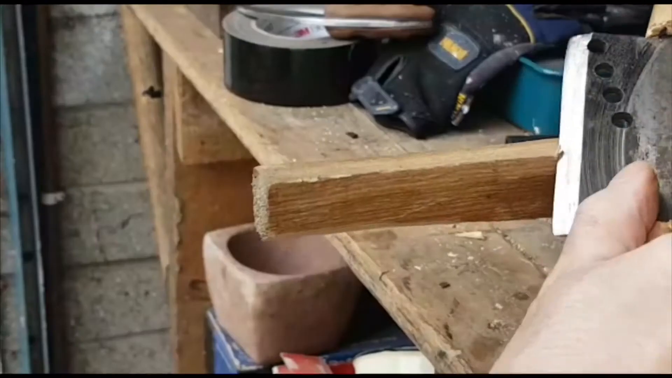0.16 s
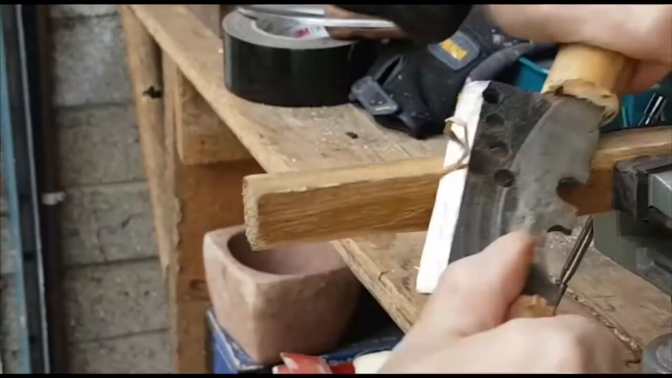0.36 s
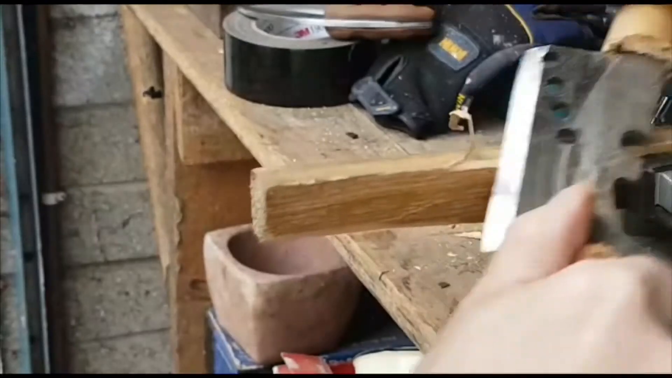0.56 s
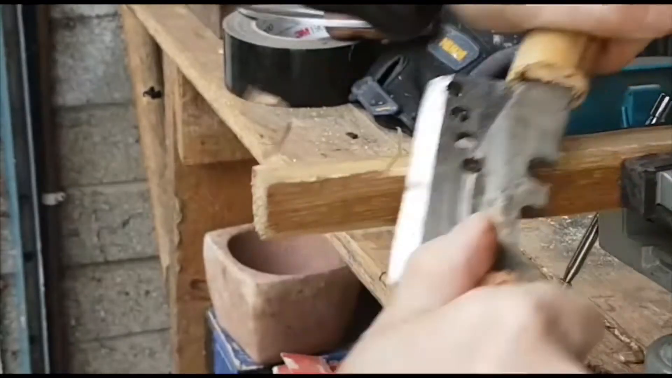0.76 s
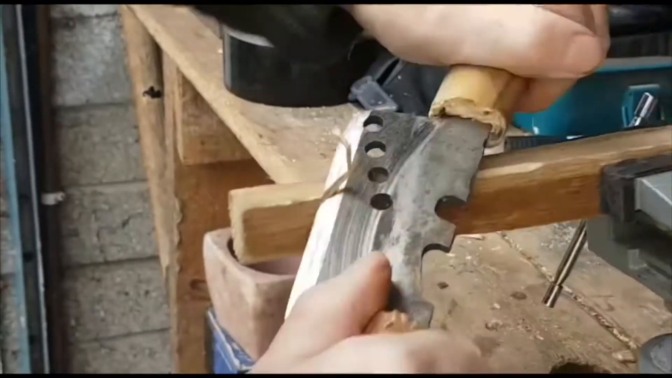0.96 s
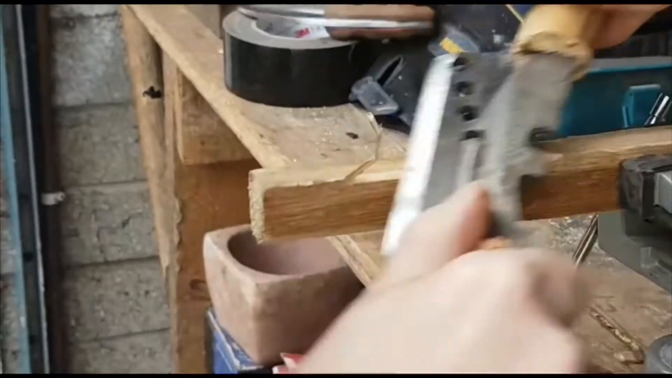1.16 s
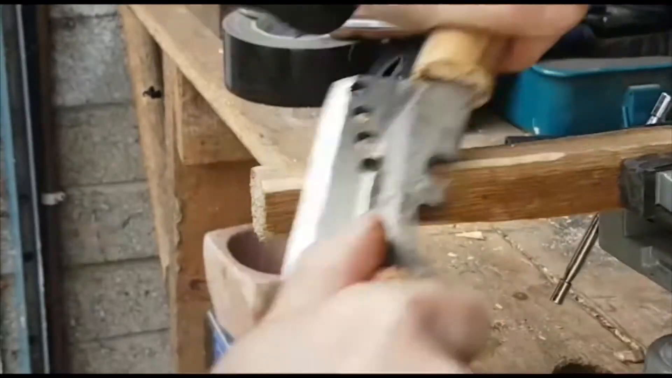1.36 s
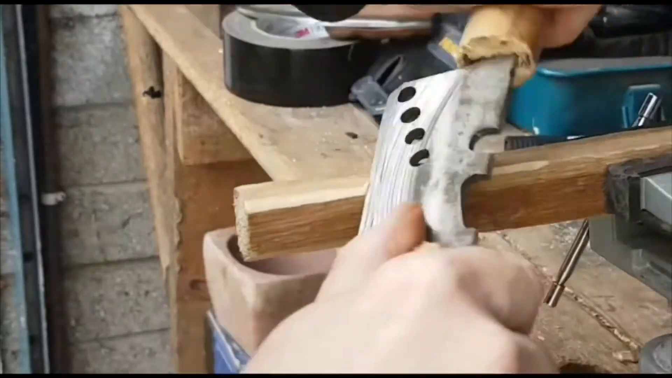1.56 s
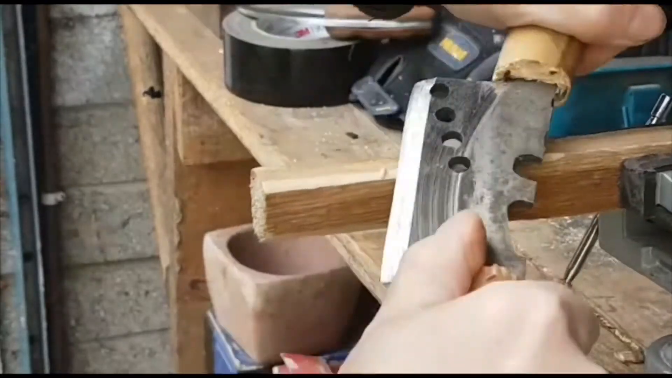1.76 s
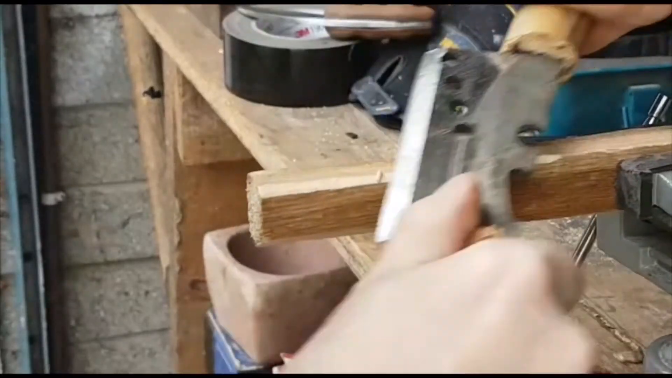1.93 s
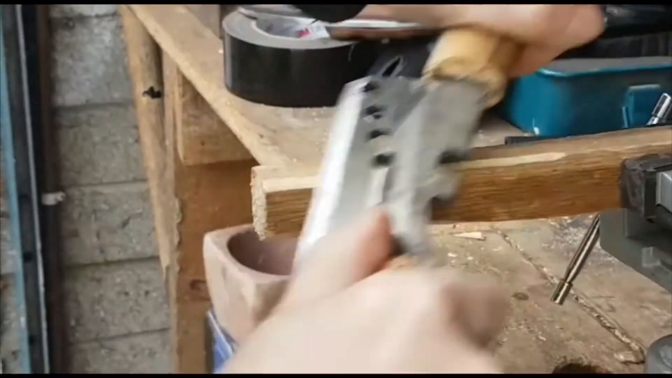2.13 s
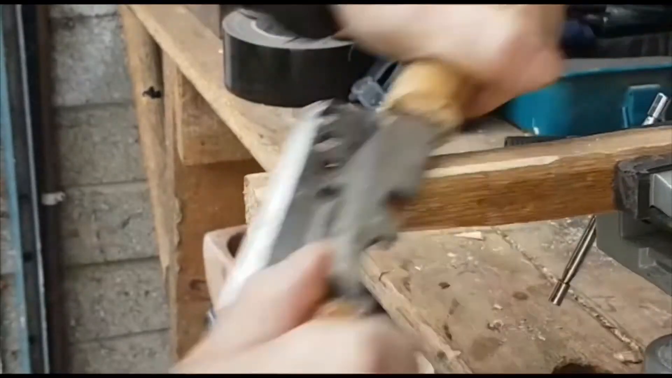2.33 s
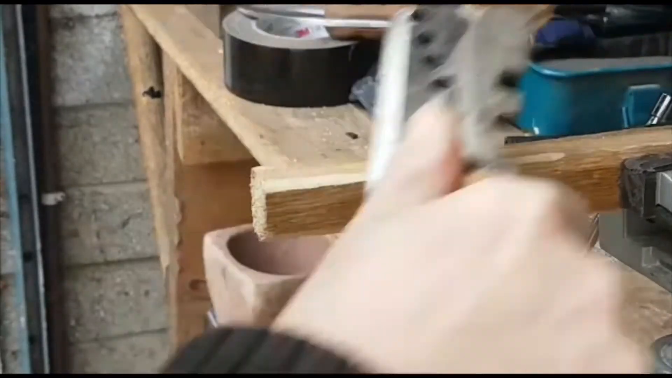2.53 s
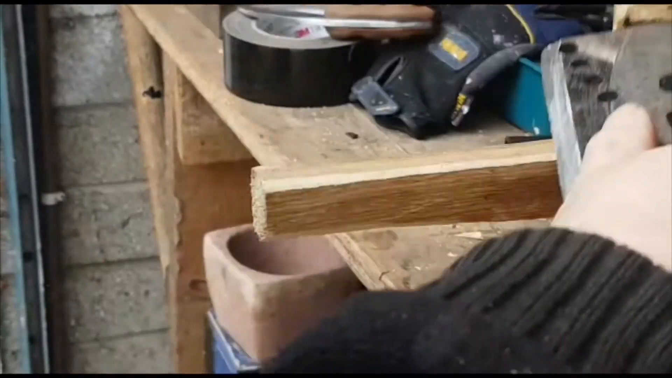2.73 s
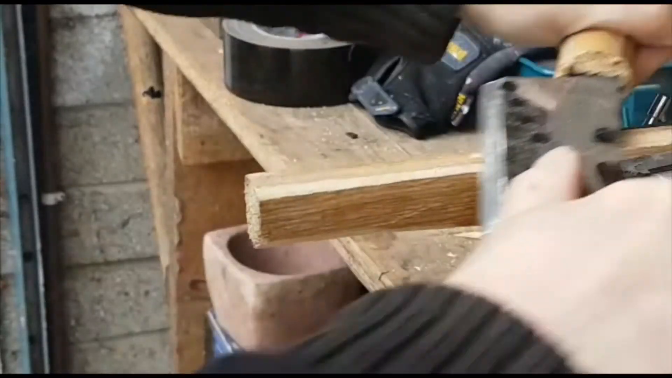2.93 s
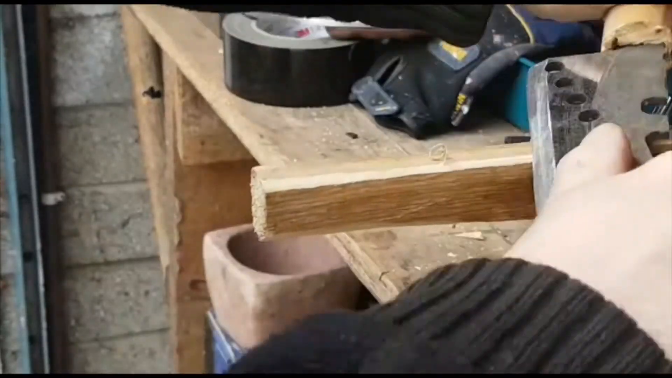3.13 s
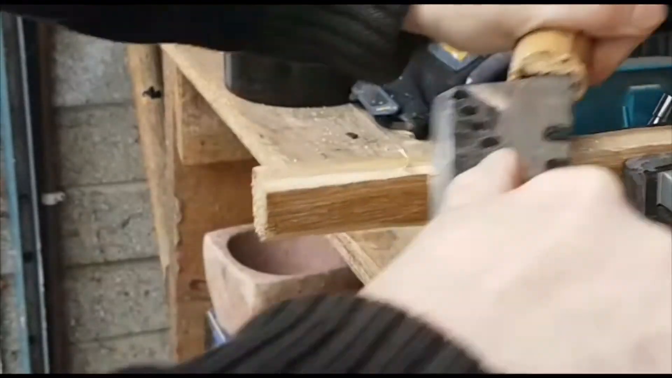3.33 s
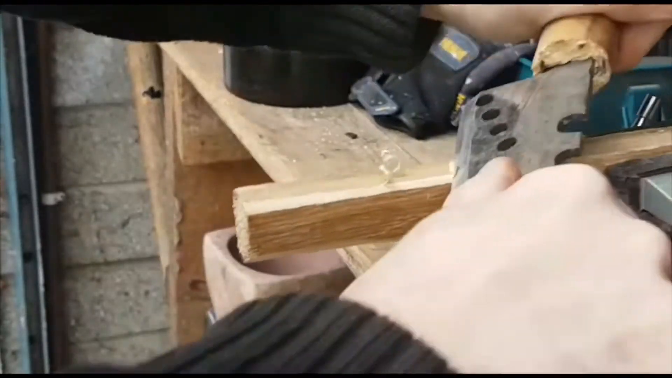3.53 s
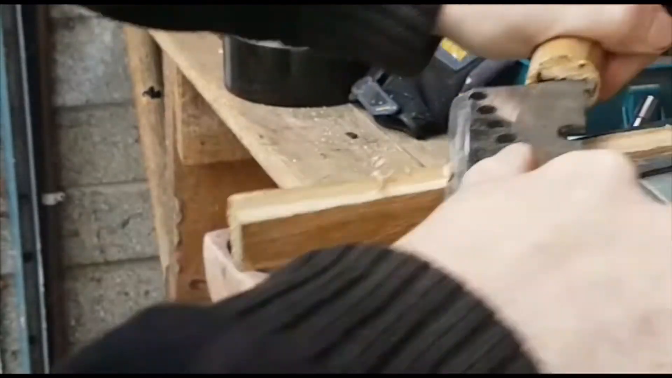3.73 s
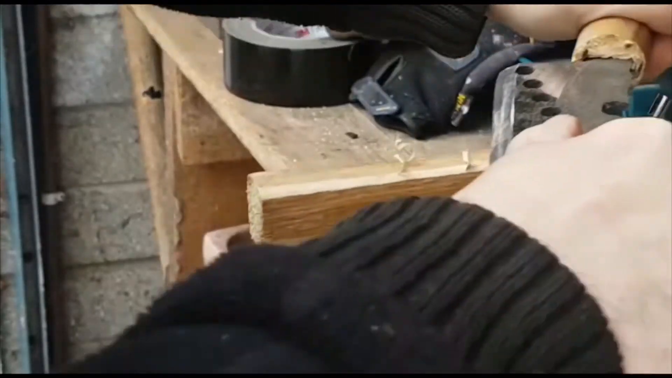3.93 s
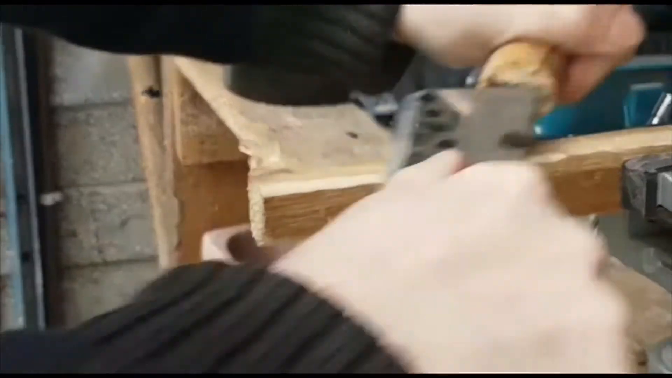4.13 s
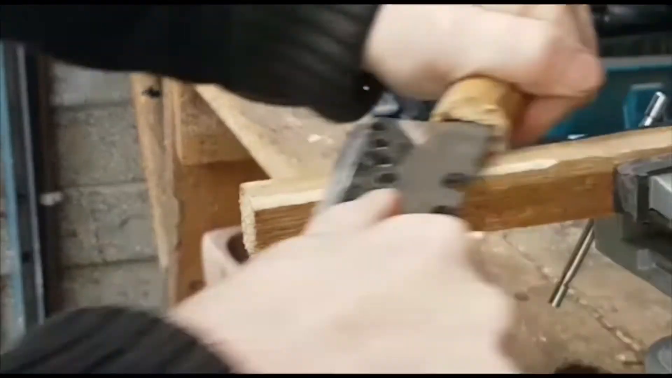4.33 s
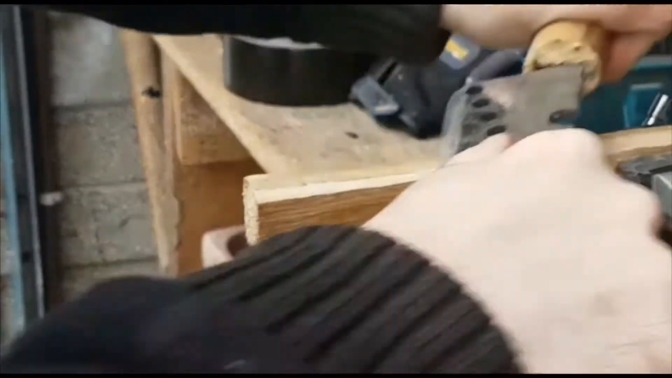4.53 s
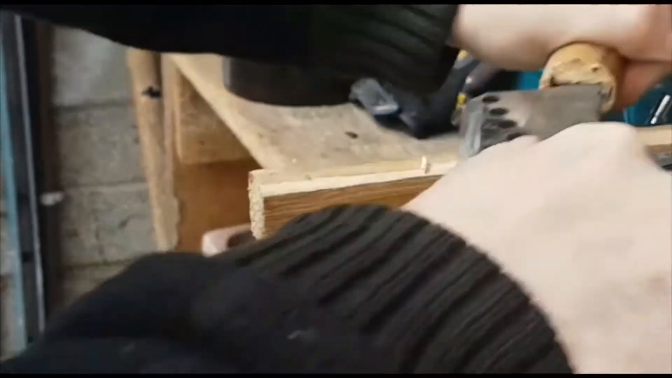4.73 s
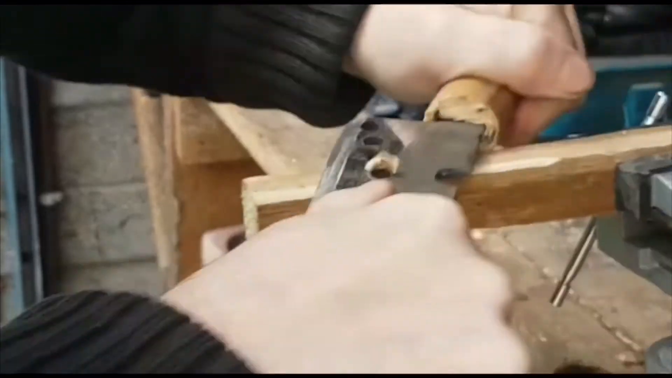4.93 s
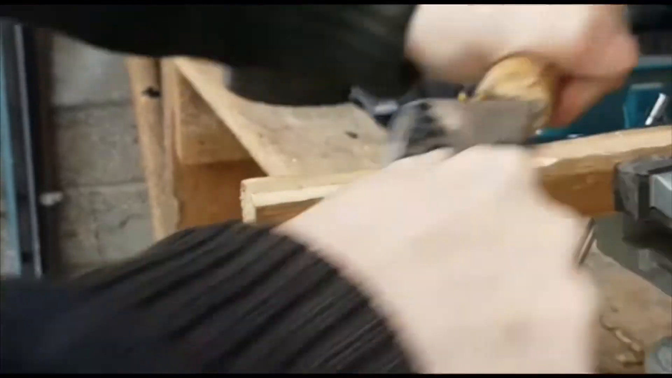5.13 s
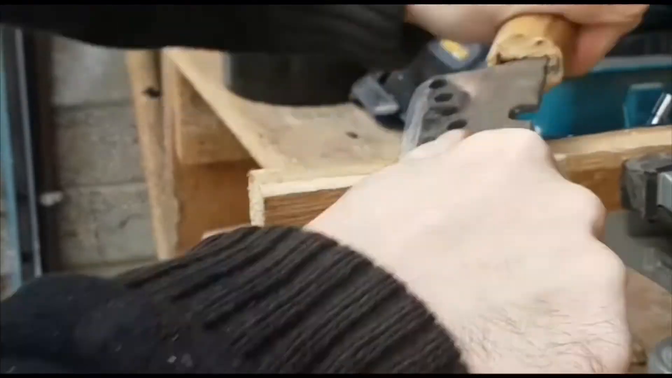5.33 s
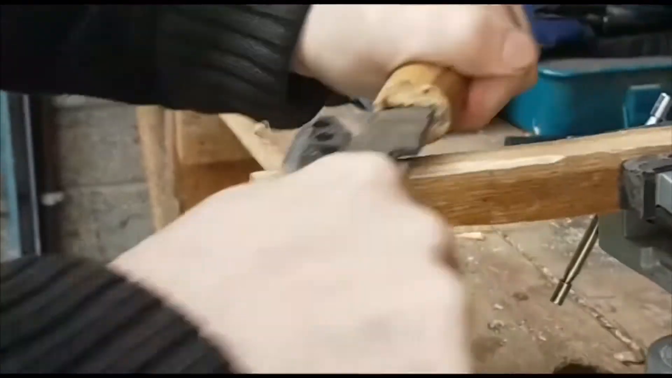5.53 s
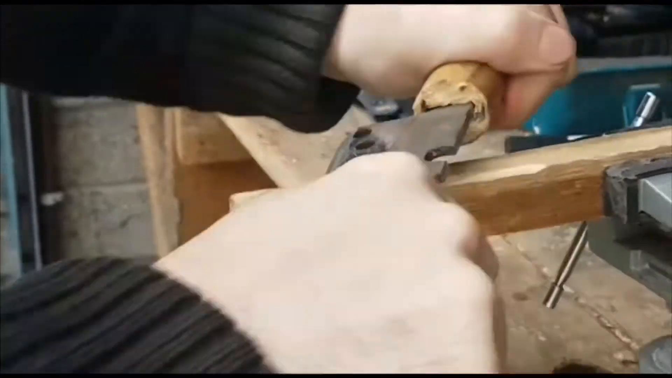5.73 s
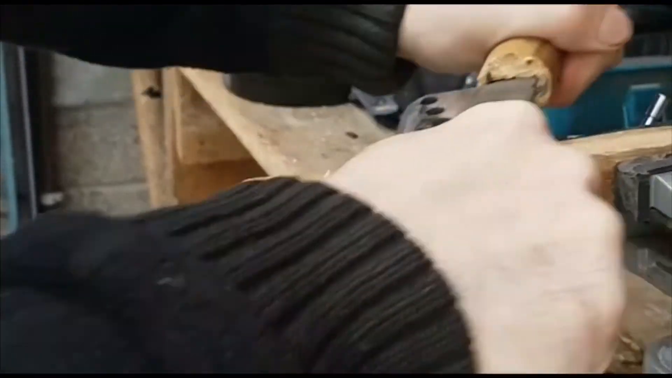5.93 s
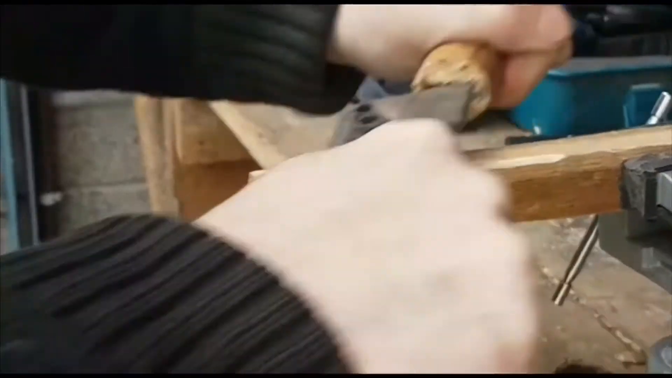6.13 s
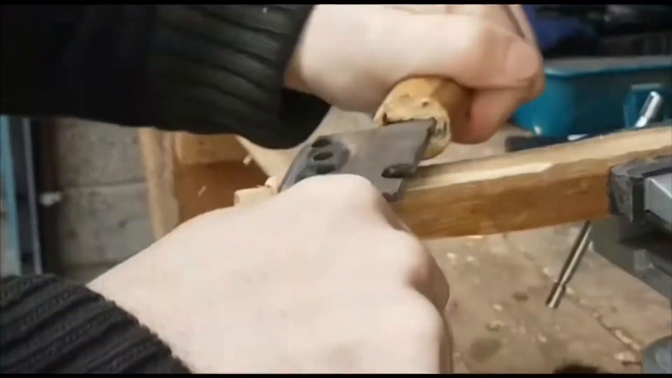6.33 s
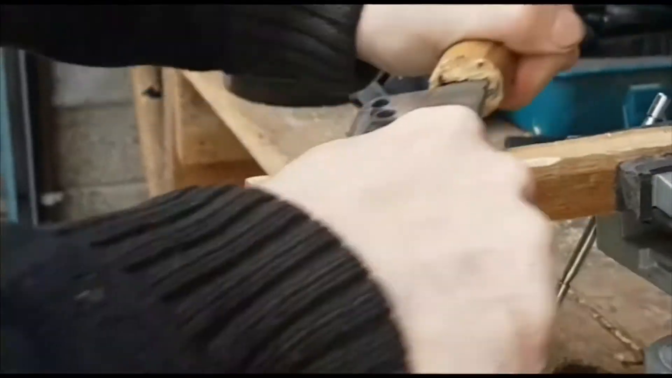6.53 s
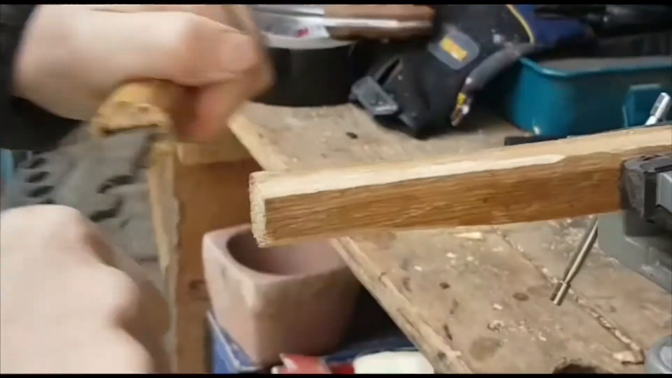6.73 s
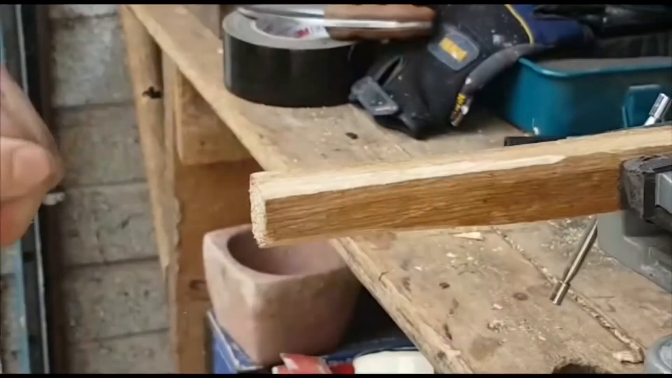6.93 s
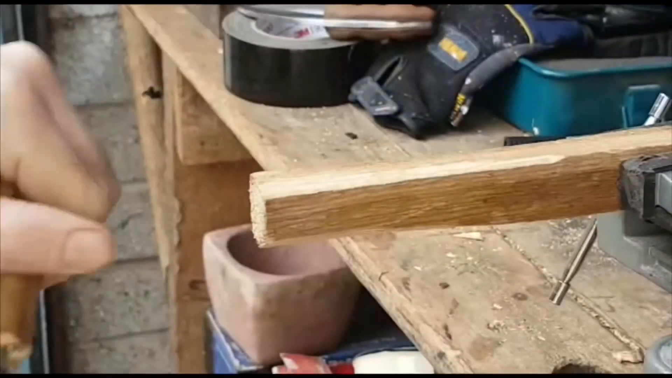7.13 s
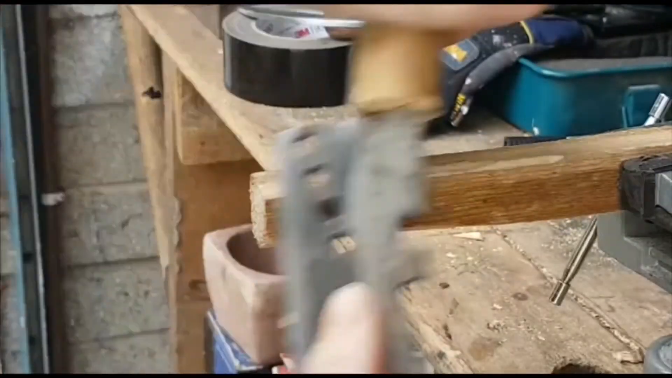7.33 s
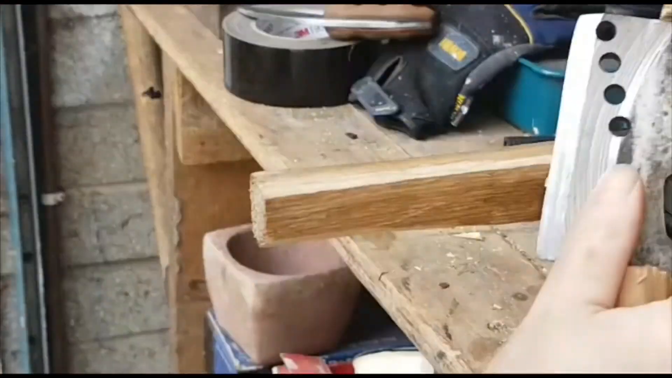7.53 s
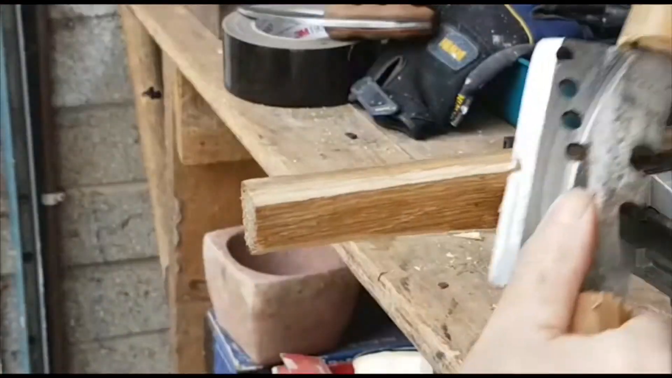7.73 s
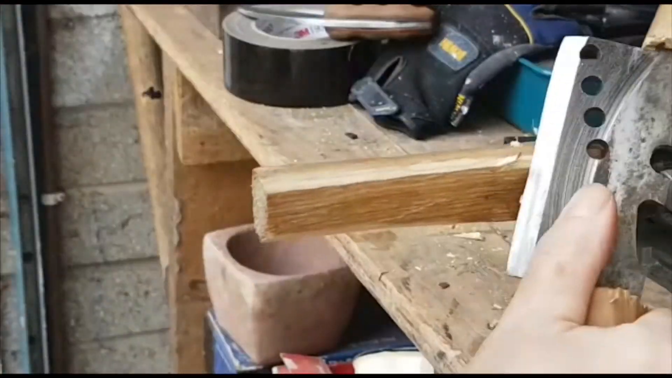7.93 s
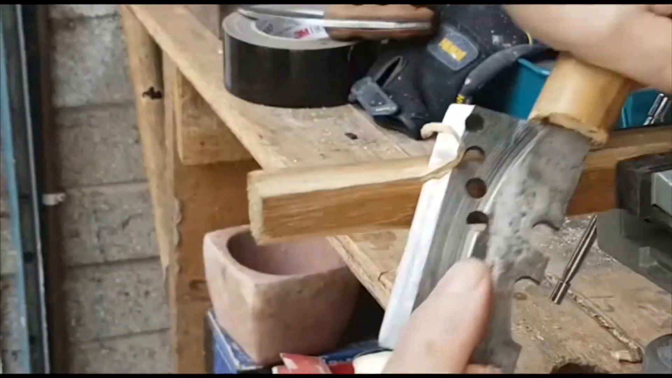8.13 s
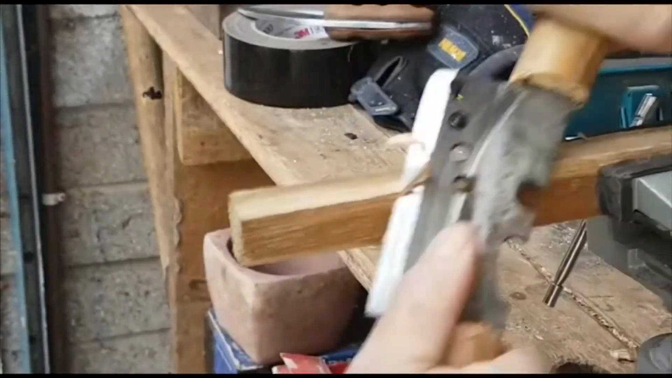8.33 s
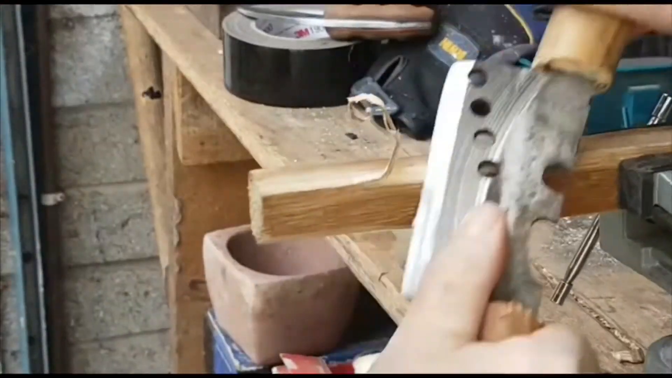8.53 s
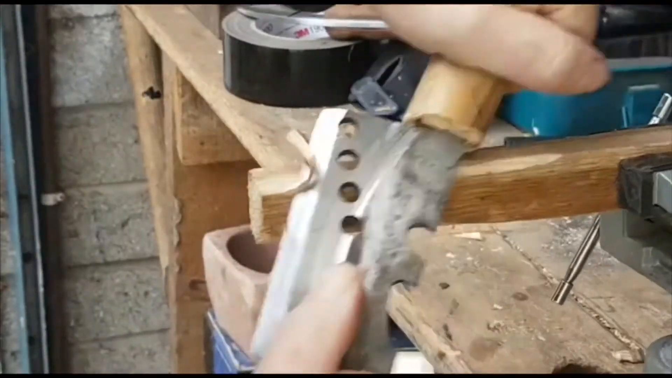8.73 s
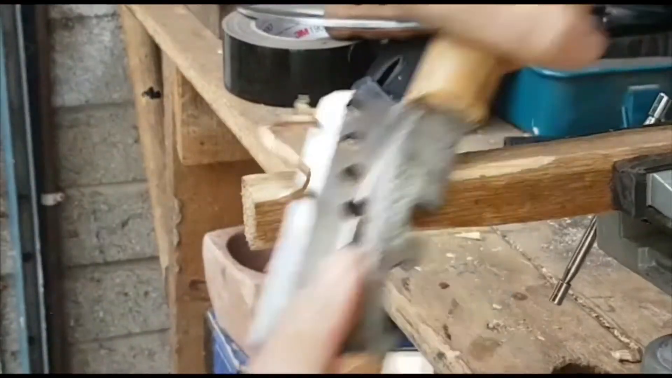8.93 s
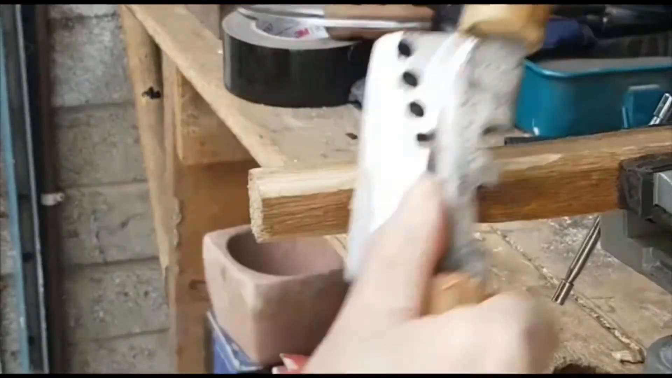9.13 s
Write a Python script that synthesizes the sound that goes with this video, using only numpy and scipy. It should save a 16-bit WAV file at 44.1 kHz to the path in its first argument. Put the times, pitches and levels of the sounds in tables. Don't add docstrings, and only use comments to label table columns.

```python
import sys
import numpy as np
from scipy import signal
from scipy.fft import rfft, irfft, next_fast_len
from scipy.io import wavfile
from scipy.ndimage import uniform_filter1d

SR = 44100
rng = np.random.default_rng(int(sys.argv[2]) if len(sys.argv) > 2 else 0)


def boost(x):
    u = np.asarray(x, float) / 20
    return 10 ** u


def master_out(mix):
    frames = np.transpose(np.atleast_2d(mix))
    ceiling = np.clip(frames, -1, 1)
    pcm = np.round(ceiling * 32767).astype(np.int16)
    wavfile.write(sys.argv[1], SR, pcm)


N = 404397
HZ = np.fft.rfftfreq(next_fast_len(N + SR // 2), 1 / SR)
SIZE = 2 * (len(HZ) - 1)

# (start [s], length [s], blade level [dB], depth of cut [dB], fastest at [share of length])
CUTS = [(.15, 0.098, -45, 1, 0.36), (.41, 0.22, -47.5, -0.5, 0.52), (.712, 0.12, -47, -4, 0.86),
        (1.35, 0.16, -54.5, -9, 0.57), (2.11, .18, -49, -1.5, 0.43), (2.72, 0.16, -53.5, -0.5, 0.61),
        (3.01, 0.16, -52, -1.5, 0.55), (3.295, 0.12, -55, 0.5, 0.3), (5.23, 0.16, -46.5, 2, 0.36),
        (5.52, 0.16, -51.5, -3.5, 0.27), (5.785, 0.21, -47, 2.5, 0.37), (6.075, 0.21, -46.5, 1, 0.21),
        (6.39, 0.27, -44, 4, 0.28), (7.54, .17, -54, -3, 0.31), (7.83, 0.18, -49.5, 2.5, 0.68),
        (8.12, 0.21, -47.5, -3.5, 0.64), (8.43, 0.13, -47, -4.5, 0.77), (8.715, 0.17, -47, -4.5, 0.69)]
# (start [s], length [s], blade level [dB], depth of cut [dB], holds for [share of length])
BITES = [(0.128, 0.028, -54, -10, 0.38), (0.864, 0.13, -52.5, 6.5, 0.16), (1.065, 0.096, -41.5, -4, 0.25),
         (1.803, 0.048, -48.5, 0.5, 0.68), (1.848, 0.27, -53.5, 4, 0.14), (3.576, 0.08, -51, 8, 0.11),
         (3.833, 0.14, -46, 4, 0.15), (4.109, 0.13, -50.5, 1, 0.76), (4.393, 0.14, -53.5, -0.5, 0.18),
         (4.699, 0.16, -47.5, 2.5, 0.11), (4.963, 0.13, -49, 1, 0.46), (5.993, 0.024, -52.5, 7, 0.23),
         (7.875, 0.02, -52, 0.5, 0.32), (7.893, 0.018, -47.5, -2, 0.44), (8.203, 0.018, -43.5, -6, 0.31),
         (9.132, 0.1, -52, 0, 0.66)]
# (start [s], length [s], blade level [dB], weight [dB])
DRAGS = [(0.01, 0.068, -67, -0.5), (0.273, 0.11, -58, 3.5), (0.574, 0.13, -57, 1), (0.93, 0.26, -53.5, 4),
         (1.17, 0.082, -57.5, 1.5), (1.547, 0.51, -66.5, -8), (2.246, 0.089, -72.5, 17.5),
         (2.868, 0.14, -58, 0.5), (3.158, 0.13, -56, 1), (3.435, 0.25, -63.5, -2.5), (3.659, 0.095, -56, 3),
         (3.76, 0.17, -62, -4), (3.947, 0.15, -56, 4.5), (4.218, 0.16, -56, 5.5), (4.538, 0.23, -58, -8),
         (4.811, 0.081, -56.5, 5.5), (4.903, 0.0744, -61.5, -2), (5.084, 0.13, -57, 2),
         (5.388, 0.098, -52.5, 1.5), (5.663, 0.12, -58, 2.5), (5.958, 0.057, -55, 5),
         (6.275, 0.13, -58, -2), (7.682, 0.17, -66.5, -0.5), (8.016, .11, -58, -3.5), (8.304, 0.16, -59, 0),
         (8.568, 0.18, -57.5, 2), (8.882, 0.064, -59.5, 6.5)]
# (start [s], length [s], stick level [dB], wood above the stick [dB])
DIGS = [(0.137, 0.066, -40.5, -1.5), (0.179, 0.039, -33, -7.5), (0.498, 0.054, -28, -7),
        (1.325, 0.054, -57, 1), (1.83, 0.088, -32.5, -2), (2.087, 0.072, -55, 3), (2.611, 0.066, -55, -19),
        (3.583, 0.046, -41, -9), (4.537, 0.072, -54, -10), (4.907, 0.045, -52, -5), (5.1, 0.047, -54, -11),
        (5.499, 0.04, -58.5, -1), (5.573, 0.074, -46, -3), (6.464, 0.1, -36, -10),
        (7.377, 0.039, -56.5, -7), (7.554, 0.11, -53, -15), (7.637, 0.041, -48, -6.5),
        (7.9, 0.044, -36, -13), (7.944, 0.044, -39, -3.5), (8.213, 0.026, -33, -18),
        (8.246, 0.036, -29.5, -7.5), (8.528, 0.11, -46, -12), (8.831, 0.073, -35.5, -7.5),
        (9.144, 0.06, -38.5, -0.5)]
# (time [s], peak [dB], then stick, blade and crack above the peak [dB])
KNOCKS = [(0.153, -41, 5, -19, -24), (0.509, -21.5, -9.5, -32, -22.5), (0.865, -33, -14, -7, -35),
          (1.068, -49, -18, 9, -12), (1.33, -49, -4, -19, -30), (1.813, -46, -24.5, 12, -20),
          (1.847, -22.5, -12, -14, -40), (2.088, -40, -14, -22, -40), (2.15, -33.5, -26, -17, -22),
          (2.614, -46, -7, -9, -22), (3.58, -32.5, -8, -25, -15.5), (3.684, -36.5, -27, -24, -39),
          (3.832, -39, -18, -3, -25), (4.11, -40, -14, -19, -31), (4.702, -27.5, -13, -26, -16.5),
          (5.241, -36, -17, -1.5, -28), (5.847, -30.5, -14, -9, -18), (6.343, -36.5, -16, -25, -22),
          (6.472, -33, -3, 8, -10), (6.5, -37.5, 4, -3, -2), (7.873, -50, 3, -12, -17),
          (7.936, -45, -22, 10, 4), (7.977, -44.5, -30, 6, -2), (8.846, -41, 10, 8.5, -3),
          (9.133, -47.5, 3, 9, -3.5)]
# (time [s], peak [dB], treble above the peak [dB])
SNAPS = [(0.133, -47, -17), (0.4746, -43, -15), (0.5058, -24, -30), (0.5099, -23, -31), (0.5284, -36, -24),
         (0.7427, -34, -20), (0.8694, -41, -28), (1.068, -32, -17), (1.3344, -54, -23), (1.8138, -20, -34),
         (1.851, -27, -36), (2.0926, -57, -24), (2.153, -34, -24), (2.3042, -48, -24), (2.615, -48, -25),
         (2.903, -48, -21), (3.038, -37, -21), (3.1822, -44, -21), (3.5818, -28, -29), (3.661, -34, -34),
         (3.684, -43, -29), (3.832, -29, -27), (3.85, -31, -22), (4.108, -39, -23), (4.4069, -39, -19),
         (4.564, -43, -17), (4.7012, -26, -24), (4.956, -42, -21), (4.9686, -29, -22), (5.1108, -37, -22),
         (5.242, -45, -26), (5.2754, -39, -24), (5.3045, -30, -21), (5.5214, -44, -16), (5.8047, -41, -24),
         (5.8473, -25.5, -24), (5.998, -42, -25), (6.083, -41, -24), (6.099, -43, -24),
         (6.1125, -25.5, -23), (6.3433, -38, -26), (6.4126, -35, -18), (6.474, -23, -25),
         (6.4994, -30, -16), (7.386, -50, -21), (7.5587, -42, -14), (7.874, -44, -20), (7.8974, -32, -14),
         (8.2053, -42, -21), (8.2514, -21, -25), (8.458, -40, -16), (8.738, -42, -19), (8.7794, -29, -21),
         (8.8423, -27, -19), (9.1336, -36, -28)]
# (start [s], length [s], first [Hz], last [Hz], level [dB])
SKIDS = [(1.33, 0.054, 652, 477, -46), (1.331, 0.012, 2340, 2320, -50), (2.089, 0.0079, 2330, 2300, -44),
         (2.09, 0.033, 597, 480, -42), (4.898, 0.038, 490, 375, -44), (5.103, 0.024, 317, 277, -43),
         (1.358, .1, 2350, 2160, -53.5), (1.384, .06, 1896, 1926, -53), (1.424, .075, 2010, 1900, -48),
         (1.595, .15, 3200, 3300, -80), (2.615, 0.024, 510, 446, -39.5), (2.646, 0.04, 457, 443, -48.5),
         (2.615, 0.0042, 2280, 2270, -41.5), (2.929, 0.089, 699, 558, -50), (3.199, 0.051, 968, 634, -45.5),
         (3.655, 0.022, 1010, 960, -38), (3.683, 0.045, 1140, 948, -40.5), (4.001, 0.03, 943, 850, -40),
         (4.03, 0.055, 846, 562, -42), (4.306, 0.055, 907, 529, -43), (5.185, 0.055, 757, 500, -44.5),
         (5.427, 0.025, 920, 846, -42), (5.434, 0.062, 636, 567, -41), (5.993, 0.086, 730, 530, -45),
         (6.344, 0.04, 625, 528, -50)]
# (start [s], length [s], first [Hz], last [Hz])
SQUEAK = (1.385, .122, 2010, 1865)

# (frequency [Hz], width [Hz], level [dB])
BENCH_MODES = [(126, 14, -0.5), (171, 33, -20.5), (207, 37, 0.5)]
STICK_MODES = [(123, 39, -12), (150.4, 11, -13), (200.6, 17.4, -3), (278.7, 34.6, 3), (339, 20, -1.5),
               (387.4, 26, -0.5), (429, 13.3, 1.5)]
WOOD_MODES = [(500, 274, -0.5), (568, 43, 2.5), (715, 112, 0.5), (884, 94, -2.5), (1014, 134, -1.5),
              (1116, 97, -10), (1096, 110, -10.5), (1366, 86, -3.5), (1590, 1230, -5.5)]
BLADE_MODES = [(1780, 120, 2), (1980, 160, 1.5), (2100, 90, 0), (2310, 150, 2), (2450, 120, -3),
               (2750, 150, -1), (3050, 110, 0), (3220, 110, 0), (3370, 140, 2)]
BLADE_HIGH_MODES = [(4690, 55, 8), (5260, 160, 0), (5630, 120, -6), (6700, 150, 0), (7420, 90, -12),
                    (8300, 180, -1), (8700, 120, -3)]
# (frequency [Hz], density [dB per Hz])
FIBRE_COLOUR = [(2100, -39), (3600, -1), (4400, -7), (6800, -4.5), (9300, -11), (12800, -9.5),
                (15300, -20.5)]
# (cutting [dB], dragging [dB], per dB of depth [dB])
BENCH_SHARE = (-7, -14, 0.29)
STICK_SHARE = (-1.1, -2.2, 1.08)
WOOD_SHARE = (2.1, 1.8, 0.68)
FIBRE_SHARE = (-8, -6.5, -0.29)

# (frequency [Hz], density [dB per Hz])
SHED_COLOUR = [(15, -39), (25, -16), (59, 2), (76, 1.5), (179, -8.5), (392, 2), (1010, -6.5), (1220, -10.5),
               (1320, -9.5), (3580, -19), (6660, -25), (8490, -27.5), (15800, -23)]
# (frequency [Hz], likeness [share])
SHED_ALIKE = [(60, 0.98), (300, 0.46), (700, 0.52), (1400, 0), (16000, 0.033)]
# (frequency [Hz], level [dB])
MAINS = (47, -90)
# (time [s], length [s], pitch [Hz], level [dB])
PEEPS = [
    (6.942, 0.033, 3100, -84),
    (7.177, 0.032, 2602, -82),
    (9.047, 0.017, 2470, -79),
    (9.075, 0.02, 2570, -81),
    (9.09, 0.014, 2640, -84),
]

TEARING_PIVOT_DB = -67


def knife():
    pivot = boost(TEARING_PIVOT_DB)
    wood_in_dig = np.array(DIGS)[:, 3]
    grain_db = 1.4 * walk(140)
    coarse = slips(500, spread_db=3.5, hiss=0.91, count=5)
    fine = slips(2000, spread_db=6, hiss=0.62, count=5)
    _, peak, low, clang, crack = np.transpose(KNOCKS)
    place = places(11, count=3)
    place = boost(1.5) * place / place.sum(axis=0)
    blade_force = force_on((0, 0, 0), wood_in_dig - 14)
    tearing = pivot * (force_on(FIBRE_SHARE, wood_in_dig - 22) / pivot) ** 1.26

    def driven(response, rub, force, throb_db, knocks):
        return ring(unit(rub) * force * boost(throb_db + grain_db) + knocks, response, place)

    bench = driven(body(BENCH_MODES, fill=0.063, spread_db=2.0) * band(89, 222),
                   coarse[0] + rng.standard_normal(N), force_on(BENCH_SHARE, -21.0),
                   2.5 * walk(15), blows(peak + low + 18, 1.3, 7.8, 0.012))
    stick = driven(body(STICK_MODES, fill=0.085, spread_db=3.5) * band(80, 546),
                   coarse[1], force_on(STICK_SHARE, 0),
                   2.5 * walk(25), blows(peak + low + 27, 0.73, 12.0, 0.014))
    wood = driven(body(WOOD_MODES, fill=0.32, spread_db=-1.5) * band(379, 1580),
                  coarse[2] + 0.49 * fine[0], force_on(WOOD_SHARE, wood_in_dig),
                  2.22 * walk(60), blows(peak + 21, 0.32, 19.6, 0.035))
    blade = driven(body(BLADE_MODES, fill=0.94, spread_db=-0.5) * band(1490, 3980) * band(540, 3420),
                   0.24 * coarse[3] + fine[1], blade_force,
                   1.1 * walk(70), blows(peak + clang + 14, 0.056, 8.8, 0.091))
    fibre_colour = boost(on_hz(FIBRE_COLOUR)) * band(5060, 19700)
    fibre = driven(fibre_colour * body(BLADE_HIGH_MODES, fill=0.74, spread_db=7.0),
                   fine[2] + 0.12 * coarse[4], tearing,
                   0.63 * walk(90), blows(peak + crack + 4, 0.015, 5.7, 0.7))
    bodies = bench + stick + wood + blade + fibre
    return bodies + rasp(fine[4], blade_force, grain_db) + curl(fine[3], tearing, grain_db) + skids() + snaps()


def rasp(rub, blade_force, grain_db):
    level = boost(TEARING_PIVOT_DB - 6.5 + grain_db + 2.6 * walk(30))
    growth = (blade_force / boost(TEARING_PIVOT_DB)) ** 0.88
    return through(rub * level * growth, unit(band(3050, 3450) ** 2))


def curl(rub, tearing, grain_db):
    level = boost(TEARING_PIVOT_DB - 4 + grain_db + 1.3 * walk(70))
    growth = (tearing / boost(TEARING_PIVOT_DB)) ** 1.1
    return through(rub * level * growth, band(9750, 21600))


def force_on(share, dig_db):
    cuts, bites, drags, digs = map(np.array, (CUTS, BITES, DRAGS, DIGS))
    cut_db, drag_db, per_depth = share
    swell, slowing, catch_s, linger_s = 1.48, 3.5, 0.0015, 0.013
    fastest = np.clip(cuts[:, 4], .05, .95)
    holds = np.clip(bites[:, 4], .05, .95)
    cut_level = cuts[:, 2] + cut_db + per_depth * cuts[:, 3]
    bite_level = bites[:, 2] + cut_db + per_depth * bites[:, 3]
    drag_level = drags[:, 2] + drag_db + per_depth * drags[:, 3]
    power = arch(cuts, cut_level, fastest, fastest, swell, slowing)
    power += arch(bites, bite_level, catch_s / bites[:, 1], holds, 0.85, slowing)
    power += arch(drags, drag_level, 0.34, 0.34, 0.77, 0.77)
    power += arch(digs, digs[:, 2] + dig_db, 0.17, 0.17, 2.54, 2.54)
    keep = np.exp(-1 / (linger_s * SR))
    return np.sqrt(np.maximum(power, signal.lfilter([1 - keep], [1, -keep], power)))


def arch(rows, db, rise, top, round_up, round_down):
    out = np.zeros(N + SR)
    for (s, length, *_), gain, up, hold in zip(rows, *np.broadcast_arrays(boost(db), rise, top)):
        share = np.arange(int(length * SR)) / (length * SR)
        rising = np.sin(np.pi / 2 * np.clip(share / up, 0, 1)) ** round_up
        falling = np.sin(np.pi / 2 * np.clip((1 - share) / (1 - hold), 0, 1)) ** round_down
        out[int(s * SR):][:len(share)] += (gain * rising * falling) ** 2
    return out[:N]


def slips(per_s, spread_db, hiss, count):
    chance = rng.random((2 + count, N))
    happens = chance[0] < per_s / SR
    size = happens * boost(np.minimum(-spread_db * np.log(chance[1] + 1e-9), 16))
    return unit(unit(size * (chance[2:] - .5)) + hiss * rng.standard_normal((count, N)))


def blows(db, push_ms, rattle_ms, rattle):
    out = np.zeros(N + SR)
    t = np.arange(SR // 10) / SR
    push = np.exp(-1000 * t / push_ms)
    push /= push.sum()
    grit = rng.standard_normal((len(KNOCKS), len(t))) * np.exp(-1000 * t / rattle_ms)
    for (s, *_), gain, noise in zip(KNOCKS, boost(db), grit):
        out[int(s * SR):][:len(t)] += gain * (push + rattle * noise)
    return out[:N]


def body(modes, fill, spread_db, count=3):
    hz, width, db = np.transpose(modes)[:, :, None]
    chance = rng.standard_normal((2, count, len(modes), 1))
    chance = chance - chance.mean(axis=1, keepdims=True)
    strength = boost(db + spread_db * chance[0])
    tuned = hz * (1 + 0.012 * chance[1])
    damping = (HZ * width) ** 2
    peaks = (strength * HZ * width) ** 2 / ((tuned ** 2 - HZ ** 2) ** 2 + damping)
    power = fill ** 2 + np.sum(peaks, axis=1)
    cepstrum = irfft(np.log(power))
    cepstrum[:, len(HZ):] = 0
    cepstrum[:, 0] /= 2
    return np.exp(rfft(cepstrum))


def ring(force, responses, place):
    spectrum = sum(rfft(force * here, SIZE) * unit(response) for here, response in zip(place, responses))
    return irfft(spectrum, SIZE)[:N]


def places(rate, count):
    share = np.array([walk(rate) for _ in range(count)]) ** 2
    return share / np.sqrt(np.sum(share ** 2, axis=0))


def snaps():
    low, high = np.zeros((2, N + SR))
    t = np.arange(SR // 100) / SR
    splinters = rng.standard_normal((len(SNAPS), len(t))) * np.exp(-1000 * t / 0.41) * 0.21
    for (s, db, treble_db), click in zip(SNAPS, splinters + (t == 0)):
        low[int(s * SR):][:len(t)] += boost(db + 16) * click
        high[int(s * SR):][:len(t)] += boost(db + treble_db + 27) * click
    return through(low[:N], band(500, 3300)) + through(high[:N], band(4500, 14000))


def skids():
    out = np.zeros(N)
    for s, length, first_hz, last_hz, db in SKIDS:
        share = np.arange(int(length * SR)) / (length * SR)
        smooth = int(SR / (150 + 0.07 * first_hz))
        rough = uniform_filter1d(rng.standard_normal((2, len(share))), smooth)
        phase = 2 * np.pi * np.cumsum(first_hz + (last_hz - first_hz) * np.sqrt(share)) / SR
        swell = np.minimum(np.minimum(share / 0.04, (1 - share) / 0.052), 1) * np.exp(-1.2 * share)
        tone = unit(rough[0] * np.cos(phase) + rough[1] * np.sin(phase))
        out[int(s * SR):][:len(share)] += boost(db) * swell * tone
    return out


def squeak():
    s, length, first_hz, last_hz = SQUEAK
    share = np.clip((np.arange(N) / SR - s) / length, 0, 1)
    hz = (first_hz + (last_hz - first_hz) * share ** 1.3) * (1 + 0.014 * walk(300))
    swell = np.sin(np.pi * share ** 1.6) ** .5
    return boost(-54 + 4.6 * walk(110)) * swell * np.sin(2 * np.pi * np.cumsum(hz) / SR)


def ports(x, count=7):
    t = np.arange(SR // 4) / SR
    bench_tail = boost(-27) * np.exp(-t / 0.0039) * (t > .0004)
    wall_tail = boost(-45.0 - 60 * t / 0.27) * (t > .004)
    tail = bench_tail + wall_tail
    mid, side = sum(rfft(x * here, SIZE) * rfft(rng.standard_normal((2, len(t))) * tail, SIZE)
                    for here in places(18, count))
    apart = boost(on_hz([(60, -12), (200, -28), (500, 0.5), (2000, 5.0), (16000, 0.0)])) * side
    tilt = boost(on_hz([(100, -1.0), (300, 1.3), (2000, -0.03), (8000, 0.98), (14000, 2.4)]))
    lag = np.exp(-2j * np.pi * HZ * 1.56 / SR)
    direct = boost(on_hz([(300, -1.0), (1500, -1.0), (5000, -4.5), (14000, -9)])) * rfft(x, SIZE)
    mid = boost(on_hz([(300, 0.0), (2000, 3.05), (12000, 2.0)])) * mid
    left = tilt * (lag * direct + mid + apart)
    right = (direct + mid - apart) / tilt
    return irfft([left, right], SIZE)[:, :N]


def shed():
    alike = np.clip(on_hz(SHED_ALIKE), 0, .99)
    colour = boost(on_hz(SHED_COLOUR)) * np.sqrt([1 + alike, 1 - alike])
    mid, side = through(rng.standard_normal((2, N)), colour)
    air = unit(np.array([mid + side, mid - side])) * boost(-63 + 0.2 * walk(0.99))
    hz, db = MAINS
    return air + np.sqrt(2) * boost(db) * np.sin(2 * np.pi * hz * np.arange(N) / SR)


def bird():
    out = np.zeros(N)
    for s, length, hz, db in PEEPS:
        t = np.arange(int(length * SR)) / SR
        swell = np.sqrt(np.sin(np.pi * t / length))
        out[int(s * SR):][:len(t)] += boost(db + 8.5) * swell * np.sin(2 * np.pi * hz * t)
    return out


def unit(x):
    return x / np.sqrt(np.mean(np.abs(x) ** 2))


def on_hz(table):
    hz, value = np.transpose(table)
    return np.interp(np.log(HZ + 1), np.log(hz), value)


def through(x, response):
    return irfft(rfft(x, SIZE) * response, SIZE)[..., :N]


def band(lo_hz, hi_hz):
    sos = signal.butter(2, [lo_hz, hi_hz], "band", fs=SR, output="sos")
    return signal.sosfreqz(sos, HZ, fs=SR)[1]


def walk(rate):
    k = int(SR / rate)
    held = np.repeat(rng.standard_normal(N // k + 1), k)
    return unit(uniform_filter1d(held, k)[:N])


def scene():
    return boost(-2.5) * ports(knife()) + squeak() + shed() + bird()


def band_limit(x):
    return signal.sosfilt(signal.butter(12, 16010, fs=SR, output="sos"), x)


def record(dry):
    mix = through(dry, HZ < 15850) - .0005
    return band_limit(mix)


dry = scene()
out = record(dry)
master_out(out)
```